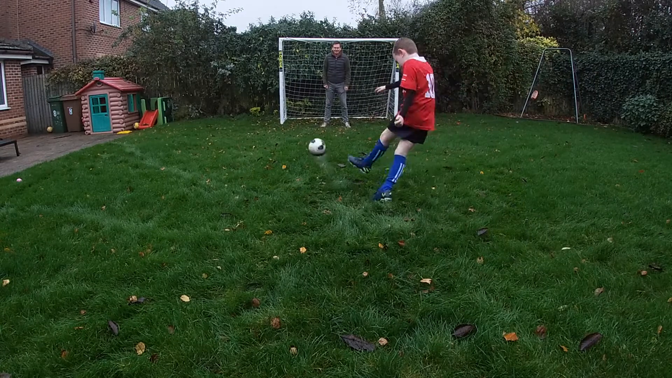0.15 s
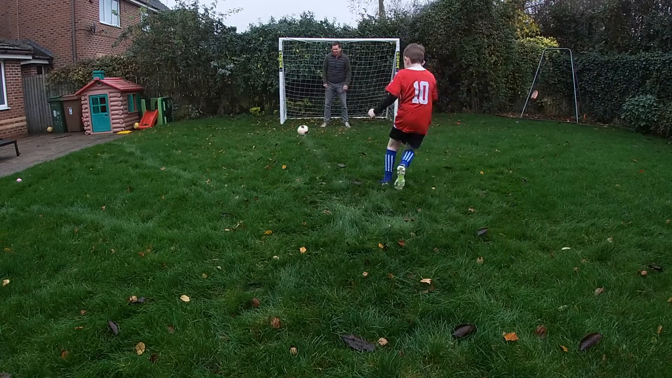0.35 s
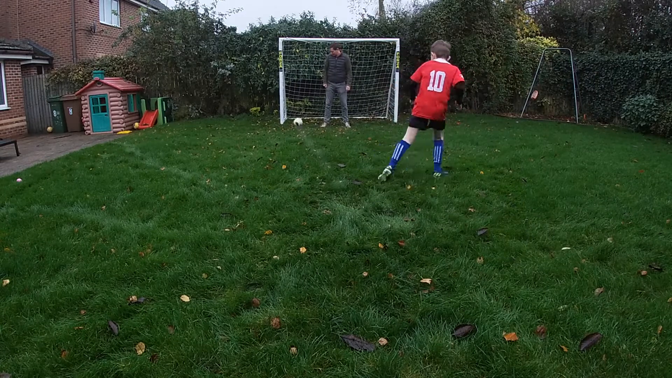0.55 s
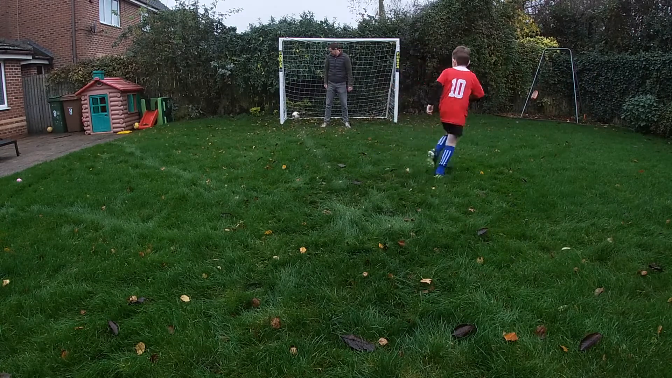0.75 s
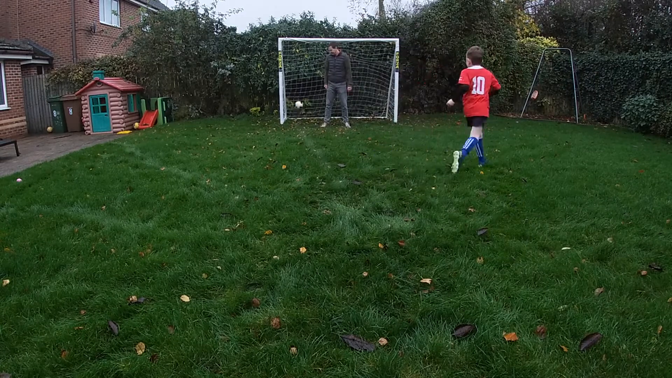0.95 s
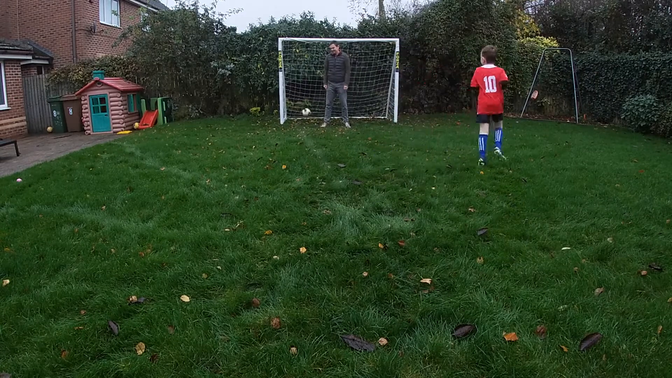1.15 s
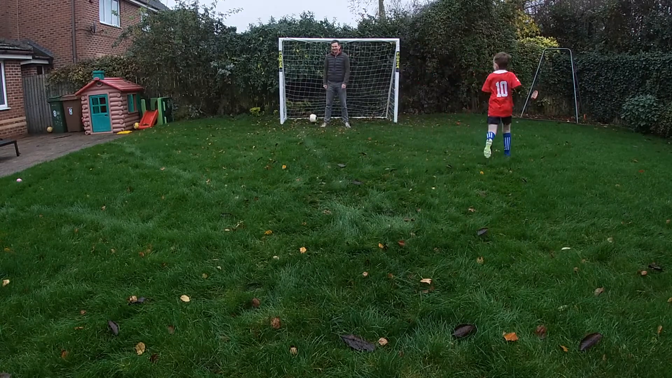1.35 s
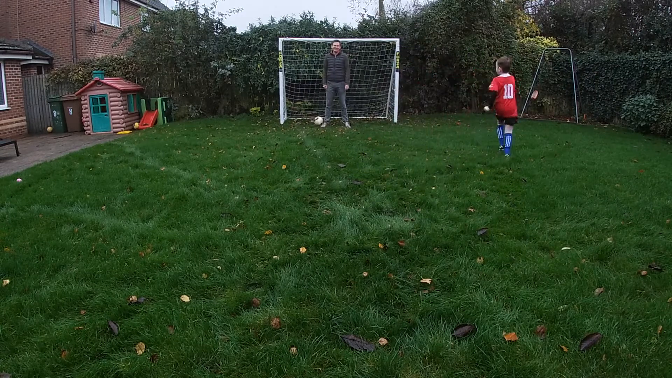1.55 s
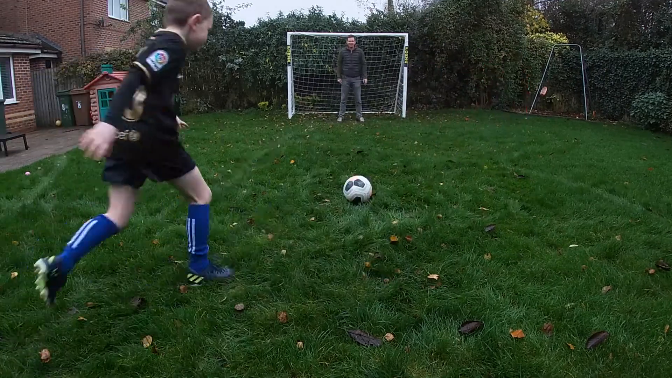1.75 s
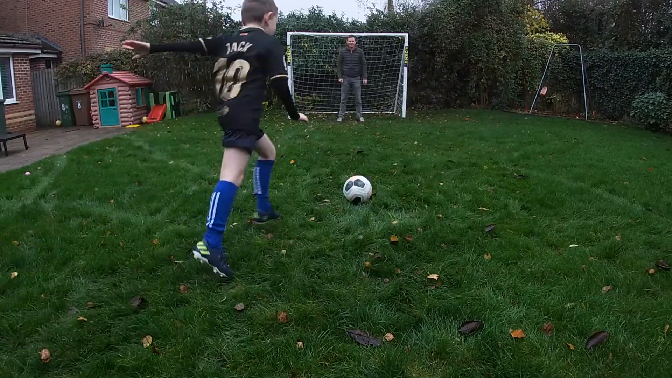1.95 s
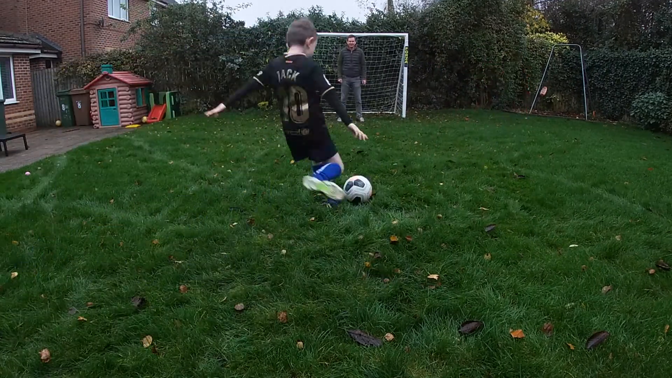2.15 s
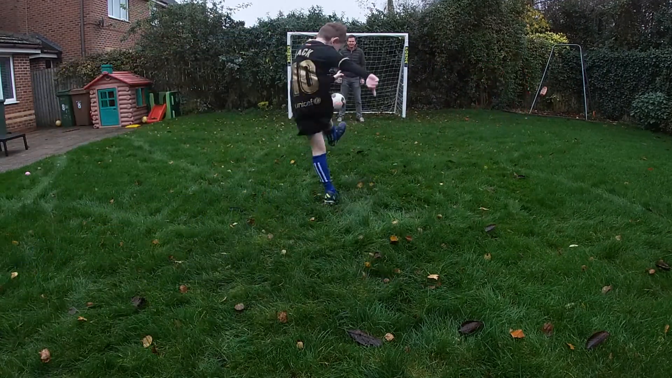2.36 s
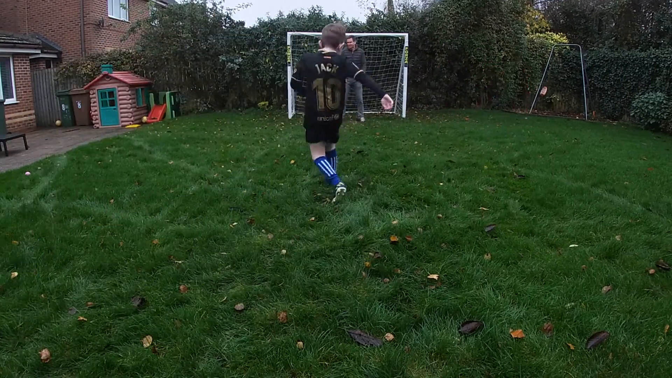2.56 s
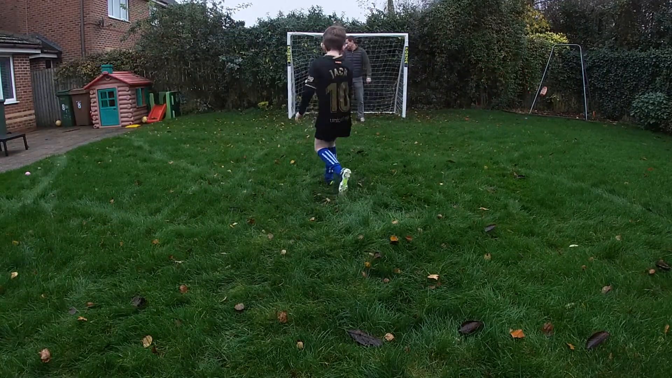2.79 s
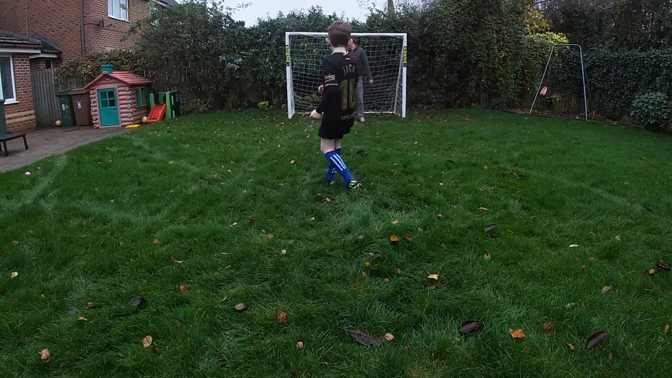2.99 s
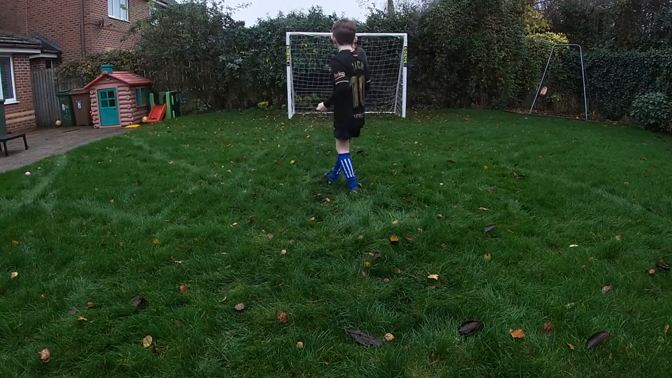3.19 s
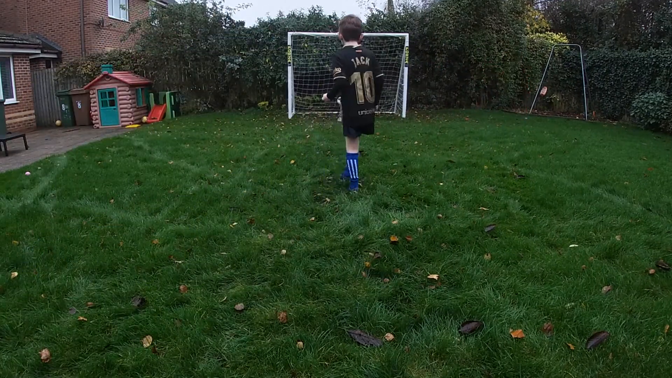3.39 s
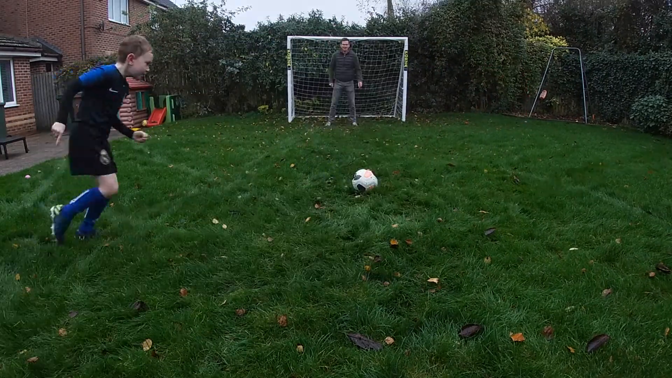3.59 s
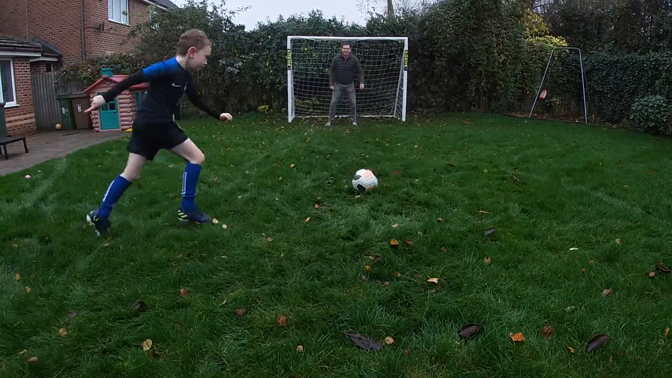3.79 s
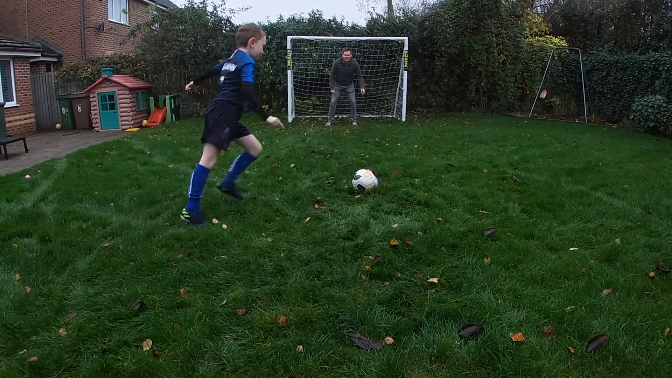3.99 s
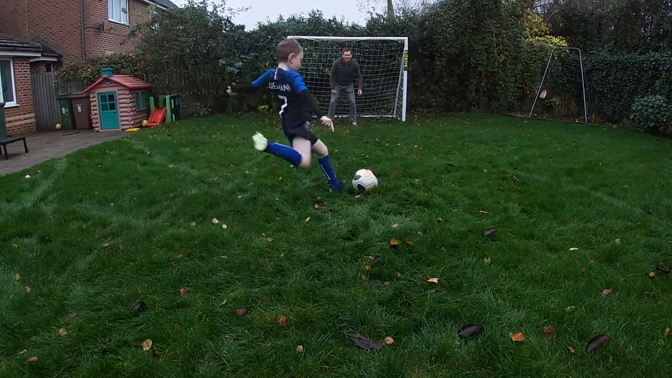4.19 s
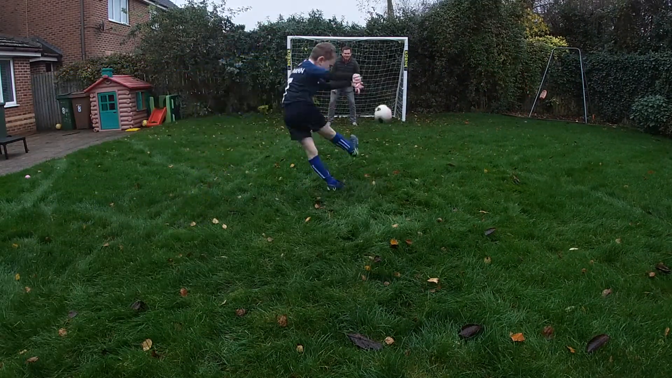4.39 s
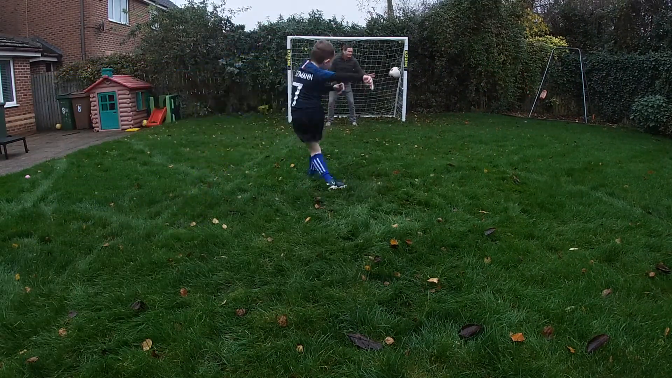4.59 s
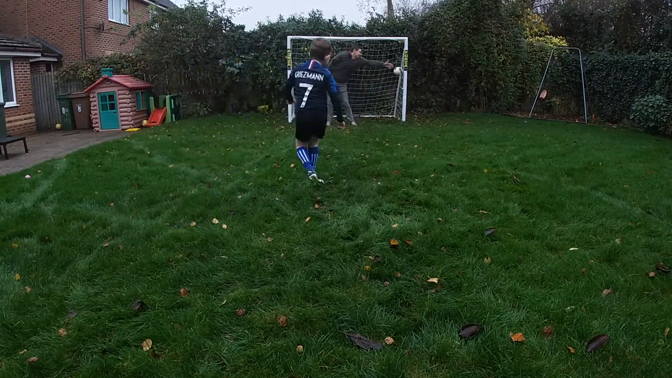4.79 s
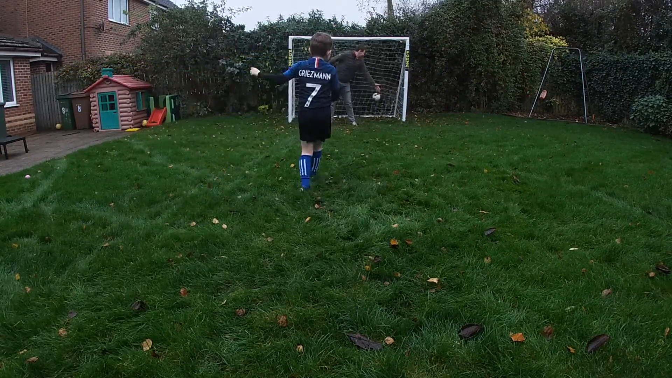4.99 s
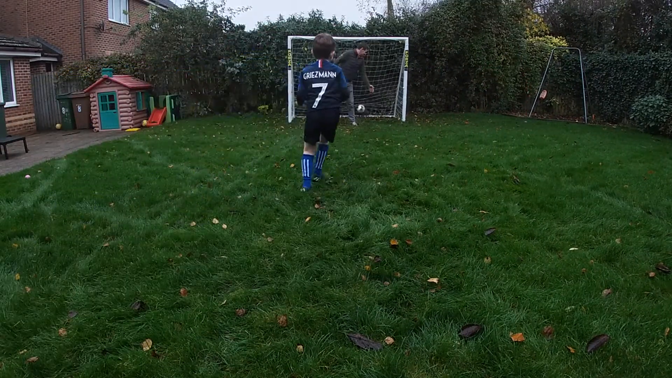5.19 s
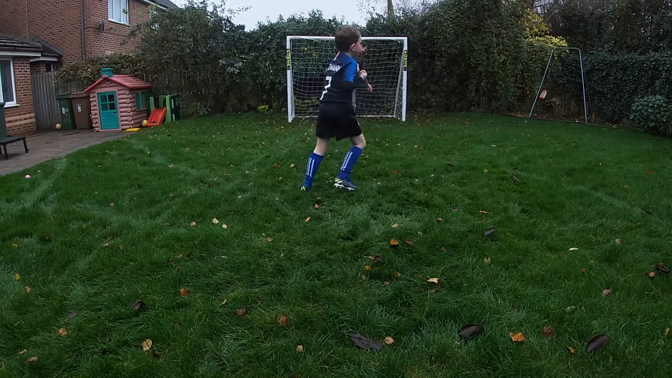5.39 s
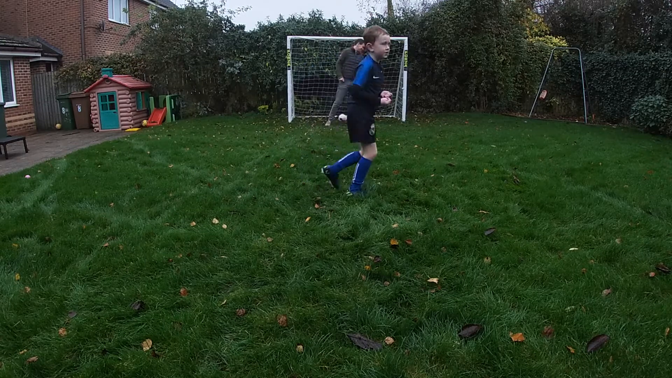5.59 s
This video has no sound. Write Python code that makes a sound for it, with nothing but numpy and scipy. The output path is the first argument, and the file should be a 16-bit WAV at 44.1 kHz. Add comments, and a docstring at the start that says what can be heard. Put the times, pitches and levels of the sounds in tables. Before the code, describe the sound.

A ball is booted three times on grass with sharp, booming thuds; between them come faint leafy crashes, steps and hollow knocks.

```python
"""Three hard football kicks on a garden lawn

Each boot brushes the grass (coloured snaps), slaps the ball (a cracked noise burst) and makes it boom (sines).
House walls and fences return the boom as dull echoes and a scattered tail.
The ball crashes into net and hedge as clumped snaps, scrapes as filtered ones, and knocks and drops as sines.
Feet and ball swish, tick and rustle in grass and leaves (clumped snaps); behind them lie distant traffic,
a faint rustle of leaves and a low rumble as players run near the microphone, all shaped noise."""
import sys
import numpy as np
from scipy import signal
from scipy.fft import rfft, irfft
from scipy.io import wavfile
from scipy.ndimage import uniform_filter1d

SR = 44100
rng = np.random.default_rng(int(sys.argv[2]) if len(sys.argv) > 2 else 0)


def master(y):
    """Save y as 16-bit WAV."""
    cut = np.clip(np.atleast_2d(y).T, -1, 1)
    pcm = np.round(cut * 32767)  # scale
    wavfile.write(sys.argv[1], SR, pcm.astype(np.int16))


N = 249007  # length in samples

# the kicks: start_s, boom_db, skin_push_db, slap_db, grass_brush_db, departing_hiss_db
KICK_EVENTS = [(0.1136, -3, -20, -10, -37.5, -50), (2.3073, -4.5, -9, -8.5, -36, -92),
               (4.3999, -3.5, -10, -10, -31.5, -62)]
# colour of brushed or trodden grass: frequency_hz, level_db
GRASS_COLOUR = [(300, 3.5), (1100, 2.5), (1700, 0.5), (2400, -4.5), (3400, -4.5), (4600, -9), (6200, -8.5),
                (8000, -21.5), (10000, -23.5), (11500, -37.5), (15000, -44)]
# colour of rustling leaves: frequency_hz, level_db
LEAF_COLOUR = [(1060, -13.5), (1800, -3), (2070, -6), (2590, -7), (3350, -1), (5130, -6.5), (7310, -2),
               (7710, -4.5), (8430, -16.5), (9970, -15.5), (11100, -30.5), (13800, -31.5), (15000, -39)]


def kicks():
    """The boot brushes the grass and slaps the skin; the squashed ball booms and rings."""
    # modes of the ball's skin and the air inside it: pitch_hz, level_db (within the boom), t60_s
    ball_modes = [(125.2, -1, 0.072), (89.8, -7, 0.1), (169, -14, 0.065), (216, -17.5, 0.12),
                  (282.8, -19.5, 0.15), (429.3, -27, 0.19), (543, -33, 0.21), (826, -30.5, 0.068),
                  (1151, -34, 0.078)]
    # colour of the push of the skin: frequency_hz, level_db
    push_colour = [(60, -29), (220, -6), (480, 6), (800, -3), (1500, -24), (6000, -52), (15000, -100)]
    # each boot meets the panels at another spot, so each slap has its own colour: frequency_hz, level_db
    first_slap = [(300, 4.5), (450, 6), (600, 11), (820, 5), (1100, -1.5), (1700, -9), (2400, -10.5),
                  (3000, -0.5), (3800, 0), (4600, -15.5), (6300, -6.5), (8000, -25.5), (10000, -24.5),
                  (12000, -51), (15000, -44)]
    second_slap = [(300, 8), (450, 13.5), (600, 5.5), (800, -6), (1150, 9), (1600, 2.5), (2200, -2),
                   (2700, -7.5), (3400, 3), (4600, -8.5), (6200, -6.5), (8000, -17), (10000, -24),
                   (12000, -38), (15000, -39)]
    third_slap = [(300, 7.5), (450, 13), (600, 10), (850, -1.5), (1200, 3), (1600, -7.5), (2500, -5),
                  (3400, -3.5), (4300, 1), (6000, -4.5), (8000, -14), (10000, -25.5), (12000, -35),
                  (15000, -36)]
    follow_db = -9.5  # the boot tears on through the grass; against the first brush

    out, t = np.zeros(N), np.arange(SR // 2) / SR
    slap_colours = [first_slap, second_slap, third_slap]
    for kick, slap_colour in zip(KICK_EVENTS, slap_colours):
        s, boom_db, push_db, slap_db, brush_db, _ = kick
        boom = np.zeros(len(t))
        for hz, db, t60 in ball_modes:
            boom -= gain_of(db) * swell(t, 0.0034, t60) * np.sin(2 * np.pi * hz * t)
        add(out, s + 0.00034, gain_of(boom_db) * boom)
        add(out, s + 0.00087, gain_of(push_db) * pulse(push_colour, size=4096))
        add(out, s, gain_of(slap_db) * crack(slap_colour, t, t60=0.011))

        # the boot skims the turf before and after contact: hiss and a low push
        brush = colour(grains(len(t), 5600, 1.7), GRASS_COLOUR, tilt_db=4.0) * swell(t, 0.0071, 0.14)
        add(out, s - 0.017, gain_of(brush_db) * brush)
        torn = colour(grains(len(t), 3900, 2.6), GRASS_COLOUR, tilt_db=1.5) * swell(t, 0.013, 0.2)
        add(out, s + 0.0045, gain_of(brush_db + follow_db) * torn)
        turf_push = np.sin(2 * np.pi * 115 * t) * swell(t, 0.009, 0.028)
        add(out, s - 0.013, gain_of(-22.5) * turf_push)
    return out


def skims():
    """The departing ball hisses over the grass, fading as it travels away."""
    out, t = np.zeros(N), np.arange(2 * SR) / SR
    for s, *_, hiss_db in KICK_EVENTS:
        hiss = colour(grains(len(t), 7500, 2.4), LEAF_COLOUR, tilt_db=4.1)
        add(out, s, gain_of(hiss_db) * hiss * swell(t, rise=0.013, t60=3.56))
    return out


def hedge():
    """The ball drives into leaves and twigs, slides down through them, and the leaves settle."""
    # the ball in net and hedge:
    # start_s, rise_s, leaf_burst_db, twig_and_net_rattle_db, slide_rustle_db, slide_length_s
    crashes = [(0.893, 0.018, -43, -42.5, -44, 0.14), (2.846, 0.085, -39.5, -43, -43.5, 0.32),
               (4.953, 0.033, -44, -39, -42.5, 0.26)]
    # colour of rattling twigs and net: frequency_hz, level_db
    twig_colour = [(100, 4), (300, 1.5), (450, 2), (700, -5.5), (1000, 2), (1350, 1.5), (1800, -4),
                   (2600, -5), (5000, -69)]
    first_touch = 0.1  # share of the burst that is there at first contact
    burst_t60, twig_t60, settle_t60 = 0.19, 0.87, 0.45  # seconds

    out, t = np.zeros(N), np.arange(SR) / SR
    for s, rise, leaf_db, twig_db, slide_db, slide_s in crashes:
        touch = first_touch * np.clip(1 - t / rise, 0, 1)
        burst = gain_of(leaf_db) * (touch + swell(t, rise, burst_t60))
        # the rustle sags slowly during the slide, then settles faster
        settling_db = -60 * np.maximum(t - slide_s, 0) / settle_t60
        slide = gain_of(slide_db + settling_db) * swell(t, rise=0.014, t60=3.9)
        leaves = np.hypot(burst, slide) * colour(grains(len(t), 7000, 0.82), LEAF_COLOUR)
        rattle = colour(grains(len(t), 1500, 1.6), twig_colour)
        twigs = gain_of(twig_db) * (touch + swell(t, rise, twig_t60)) * rattle
        add(out, s, (leaves + twigs) * clumps(len(t), 1.3))
    return out


def knocks():
    """A hollow body rings briefly under a rattling crack."""
    # knocks at the far end: start_s, ring_db, crack_db, crack_t60_s
    strikes = [(3.7860, -29.5, -72, 0.033), (4.6457, -16, -28.5, 0.11), (5.363, -21, -30.5, 0.16)]
    # colour of the crack: frequency_hz, level_db
    crack_colour = [(200, -2.5), (600, 4.5), (1100, -1), (1500, -5.5), (2000, -2), (2900, -7.5),
                    (4000, -9.5), (7000, -23), (9000, -32), (15000, -62)]
    # modes of what the ball strikes: pitch_hz, level_db (within the ring), t60_s
    small_body = [(518, -3, 0.049), (683, -13, 0.053), (763, -8, 0.033), (1090, -25, .06)]
    dull_body = [(168, -2.5, .06), (224, -1.5, 0.039), (314, -5, 0.047), (380, -8.5, 0.0515),
                 (498, -15, 0.043), (709, -12.5, 0.043), (1566, -19.5, 0.043), (1934, -15.5, 0.04),
                 (3680, -21.5, 0.03)]
    wooden_body = [(196, -7, 0.1), (280, -4.5, 0.03), (376, 1.5, 0.033), (505, -2.5, 0.034),
                   (670, -7.5, 0.07), (1003, -6.5, 0.042), (1217, -22, 0.063), (2060, -17, 0.11),
                   (2324, -13, 0.047), (2610, -23, .06), (4100, -26, .04)]

    out, t = np.zeros(N), np.arange(SR // 2) / SR
    for strike, body in zip(strikes, [small_body, dull_body, wooden_body]):
        s, ring_db, crack_db, crack_t60 = strike
        ring = np.zeros(len(t))
        for k, (hz, db, t60) in enumerate(body):
            sign = (-1) ** k  # neighbouring modes start in opposite directions
            ring += sign * gain_of(db) * np.sin(2 * np.pi * hz * t) * swell(t, 0.0026, t60)
        add(out, s, gain_of(ring_db) * ring)
        add(out, s, gain_of(crack_db) * crack(crack_colour, t, crack_t60))
    return out


def scrapes():
    """Quick slips of the ball along mesh and branches excite one broad resonance."""
    # the scrapes: start_s, level_db, centre_hz, width_hz, rise_s, t60_s
    slips = [(0.8908, -38.5, 2150, 3500, 0.0015, 0.065), (0.919, -38, 3506, 2183, 0.0024, 0.17),
             (2.8437, -37.5, 1440, 610, .0008, 0.42), (2.844, -39, 3200, 3400, .0005, 0.016),
             (2.895, -45, 3770, 1092, 0.024, .2), (4.952, -33.5, 1170, 674, 0.00091, 0.21),
             (4.952, -31, 4000, 3420, 0.00077, 0.021), (4.963, -36, 3550, 1180, 0.0012, 0.21),
             (5.571, -44.5, 2460, 3240, 0.003, 0.14)]
    out, t = np.zeros(N), np.arange(SR // 2) / SR
    for s, db, hz, width_hz, rise, t60 in slips:
        edges_hz = [max(hz - width_hz / 2, 100), hz + width_hz / 2]
        band = signal.butter(2, edges_hz, "bandpass", fs=SR)
        scrape = evened(signal.lfilter(*band, grains(len(t), 2500, 3.3)))
        add(out, s, gain_of(db) * scrape * swell(t, rise, t60))
    return out


def thuds():
    """Turf gives way under a weight: a few low cycles."""
    # soft thuds of feet and ball on the turf: start_s, level_db, pitch_hz
    drops = [(0.898, -30, 168), (1.771, -34, 73.6), (1.850, -35, 69.4), (3.102, -23, 117),
             (3.138, -27, 137), (3.346, -25.5, 52.2), (3.640, -28.5, 59), (3.716, -31.5, 70.4),
             (3.915, -27.5, 59), (3.996, -26.5, 93), (4.954, -18, 95.4), (4.992, -24, 81.5),
             (5.231, -21, 129), (5.263, -22.5, 93), (5.575, -32, 67)]
    decay_cycles = 6.2  # cycles to fall by 60 dB, so deep thuds last longer
    out, t = np.zeros(N), np.arange(SR // 2) / SR
    for s, db, hz in drops:
        add(out, s, gain_of(db) * np.sin(2 * np.pi * hz * t) * swell(t, 0.0016, decay_cycles / hz))
    return out


def swishes():
    """Feet and ball stir grass and leaves: many small snaps make swishes, ticks and rustles."""
    # swishes, ticks and rustles of feet and ball in grass and leaves:
    # start_s, level_db, rise_s, t60_s, extra_tilt_db_per_octave (on top of the shared tilt)
    stirs = [(0, -45, 0.0017, 0.26, 1), (0.704, -49.5, 0.0024, 0.073, -2), (0.860, -49.5, 0.012, 0.7, 2.5),
             (1.289, -60, .08, 0.48, 7), (1.447, -51, 0.0019, 0.058, -2), (1.644, -55, 0.0043, 0.1, 7),
             (1.73, -59.5, 0.025, 0.64, 1.5), (1.839, -54, 0.0083, 0.32, 1),
             (2.019, -46, 0.025, 0.093, 0.5), (2.194, -42, 0.0089, 0.19, 1.5),
             (2.650, -49.5, 0.0055, 0.14, -5), (2.7200, -36.5, 0.00059, 0.0056, 1.5),
             (3.088, -46, .003, 0.36, -2), (3.321, -52.5, 0.0014, 0.1, .5),
             (3.446, -50, 0.00063, 0.17, -1.5), (3.510, -38.5, 0.0086, 0.54, -8),
             (3.54, -63, 0.068, 0.45, -1), (3.704, -50, .001, 0.16, -2), (3.926, -50, 0.0023, 0.16, -1),
             (4.098, -52, 0.026, 0.11, -1.5), (4.274, -48, 0.0036, 0.16, 1.5), (4.333, -52.5, .002, 0.3, 2),
             (5.289, -48.5, 0.017, 0.7, 3.5), (5.617, -42.5, 0.00082, 0.013, 0.5)]
    shared_tilt_db = 3.5
    out, t = np.zeros(N), np.arange(SR // 2) / SR
    for s, db, rise, t60, tilt_db in stirs:
        crunch = colour(grains(len(t), 3000, 2.35), GRASS_COLOUR, tilt_db + shared_tilt_db)
        add(out, s, gain_of(db) * crunch * clumps(len(t), 1.3) * swell(t, rise, t60))
    return out


def rumble():
    """Low rumbling noise that swells and sinks as players run near the microphone."""
    # colour of the rumble: frequency_hz, level_db
    rumble_colour = [(25, 4), (45, 3), (80, -9.5), (125, -9), (200, -13.5), (400, -40), (900, -81)]
    # course of the rumble: time_s, level_db (before the rumble gain)
    rumble_course = [(0.0, -49.5), (0.27, -52), (0.36, -50), (0.66, -69), (1.56, -61), (1.89, -49),
                     (2.28, -59), (2.44, -55), (2.66, -58), (2.89, -65), (3.21, -52), (3.58, -45),
                     (4.2, -53.5), (4.48, -49), (4.65, -50), (4.83, -62), (5.65, -43)]
    rumble_gain_db = 7.5
    return gain_of(rumble_gain_db) * level(rumble_course) * noise(rumble_colour, N)


def breeze():
    """Leaves that never quite rest: a faint rustle whose level wanders by chance."""
    level_db, waver_db = -66.5, 2
    drift = uniform_filter1d(rng.standard_normal(N), size=4000)
    wander = evened(uniform_filter1d(drift, size=2000))
    return gain_of(level_db + waver_db * wander) * colour(grains(N, 5000, 3.2), LEAF_COLOUR)


def traffic():
    """Far traffic blurs into a steady coloured noise."""
    # colour of the traffic: frequency_hz, level_db
    traffic_colour = [(15, -35), (25, -8.5), (102, -5.5), (165, 1.5), (355, -13), (421, -11.5), (521, -11),
                      (592, -4.5), (658, -7.5), (732, -5), (886, -6.5), (985, -8), (1190, -10), (2300, -23),
                      (4000, -41), (5200, -32), (8800, -120)]
    return gain_of(-51.5) * noise(traffic_colour, N)


def walls(x):
    """Separate echoes of walls and fences; foliage in the way swallows their treble."""
    # the echoes: delay_s, level_db, lowpass_cutoff_hz
    echoes = [(0.018, -13, 2500), (0.037, -32, 400), (0.0558, -7.5, 200), (0.0807, -17, 450),
              (.1070, -17, 240), (0.116, -17, 200), (0.139, -29, 220), (0.1955, -29, 240),
              (0.2049, -20, 200), (0.256, -28, 240)]
    out = np.zeros(N)
    for delay, db, top_hz in echoes:
        add(out, delay, gain_of(db) * signal.lfilter(*signal.butter(2, top_hz, fs=SR), x))
    return out


def garden(x, build_s):
    """Scatter from hedges and fences: sparse taps that build up, then die band by band."""
    # colour of the scatter: frequency_hz, level_db
    scatter_colour = [(50, -8.5), (125, -17), (300, 2.5), (750, -4), (1200, 0.5), (2500, -5), (3700, -6.5),
                      (7000, 2.5), (14000, 6.5)]
    # decay of the scatter: frequency_hz, t60_s
    scatter_t60 = [(60, 0.97), (150, 0.89), (350, 0.23), (1000, 0.36), (3000, 0.4), (7000, 0.23),
                   (14000, 0.17)]
    taps = grains(SR, per_s=5000, spread_db=-2.5)
    hz, t, z = signal.stft(taps, SR, nperseg=256)
    decay_db = -60 * t / read(scatter_t60, hz)[:, None]
    z = z * gain_of(read(scatter_colour, hz)[:, None] + decay_db)
    build = np.minimum(np.arange(SR) / SR / build_s, 1)
    tail = signal.istft(z, SR, nperseg=256)[1][:SR] * build
    return signal.fftconvolve(x, tail / np.linalg.norm(tail))[:N]


def crack(spectrum, t, t60):
    """A tight noise burst that covers all pitches, coloured by the struck surface."""
    shape = swell(t, 0.000602, t60)
    x = rng.standard_normal(len(t)) * shape
    # flatten the spectrum and tighten the burst in turn
    for _ in range(12):
        flat = irfft(np.exp(1j * np.angle(rfft(x))), len(t))
        x = flat * shape ** 0.25
    x = signal.fftconvolve(x, pulse(spectrum, size=4096))[:len(t)]
    return evened(x) * np.sqrt(np.mean(shape ** 2))


def pulse(spectrum, size):
    """One causal (minimum-phase) pressure pulse of a given spectrum; peak one."""
    log_gain = np.log(gain_of(read(spectrum, abs(np.fft.fftfreq(size, 1 / SR)))))
    shape = np.fft.ifft(np.exp(np.conj(signal.hilbert(log_gain)))).real
    return shape / abs(shape).max()


def grains(size, per_s, spread_db):
    """Tiny snaps at random moments; a positive spread makes a few large, a negative one a few small."""
    sizes = gain_of(spread_db * np.minimum(rng.exponential(1, size), 4))
    return sizes * rng.choice([-1, 1], size) * (rng.random(size) < per_s / SR)


def clumps(size, spread_db):
    """Sprigs and blades give way one after another, so a rustle comes in clumps."""
    return gain_of(spread_db * evened(uniform_filter1d(rng.standard_normal(size), size=350)))


def swell(t, rise, t60):
    """A straight rise, then an exponential decay."""
    return np.clip(t / rise, 0, 1) * gain_of(-60 * np.maximum(t - rise, 0) / t60)


def colour(x, spectrum, tilt_db=0):
    """Gives x a spectrum, tilted towards some dB an octave above 1 kHz; rms one."""
    hz = np.fft.rfftfreq(len(x), 1 / SR)
    gain = gain_of(read(spectrum, hz) + tilt_db * np.log2(1 + hz / 1000))
    return evened(irfft(rfft(x) * gain, len(x)))


def noise(spectrum, size):
    """Smooth noise of a given spectrum; rms one."""
    return colour(rng.standard_normal(size), spectrum)


def gain_of(db):
    """Decibels to gain."""
    return 10 ** (np.asarray(db) / 20)


def evened(x):
    """Scales to an rms of one."""
    return x / np.sqrt(np.mean(x ** 2) + 1e-20)


def read(points, hz):
    """Reads a table on a log-frequency axis."""
    f, value = np.transpose(points)
    return np.interp(np.log(hz + 1), np.log(f + 1), value)


def level(curve):
    """Gain at every sample from rows of time_s, level_db."""
    return gain_of(np.interp(np.arange(N) / SR, *np.transpose(curve)))


def add(mix, s, sound):
    """Mixes a sound in at time s (seconds)."""
    part = mix[max(round(s * SR), 0):][:len(sound)]
    part += sound[:len(part)]


def scene():
    """Near kicks are dry with distinct echoes; far knocks are wetter."""
    kick, knock, thud = kicks(), knocks(), thuds()
    near = kick + walls(kick) + gain_of(-4.5) * garden(kick, build_s=0.014)
    far = knock + gain_of(-1.5) * garden(knock, build_s=0.0087)
    turf = thud + gain_of(-2) * garden(thud, build_s=0.022)
    rustles = skims() + hedge() + scrapes() + swishes()
    background = rumble() + breeze() + traffic()
    return (near + far + turf + rustles + background)[None]


def record(dry):
    """The microphone drops the deepest bass and rounds the tallest peaks; then the band limit."""
    peak_limit, edge_hz = 0.75, 15000
    thinned = signal.sosfilt(signal.butter(2, 36, "highpass", fs=SR, output="sos"), dry)
    rounded = thinned / (1 + (thinned / peak_limit) ** 6) ** (1 / 6)
    band_limit = signal.firwin(511, edge_hz, window=("kaiser", 9), fs=SR)
    return signal.oaconvolve(rounded, band_limit[None], "same")


dry = scene()
out = record(dry)
master(out)
```